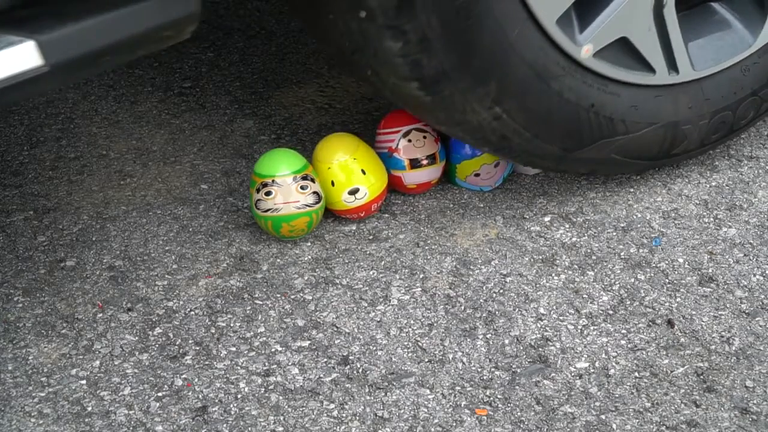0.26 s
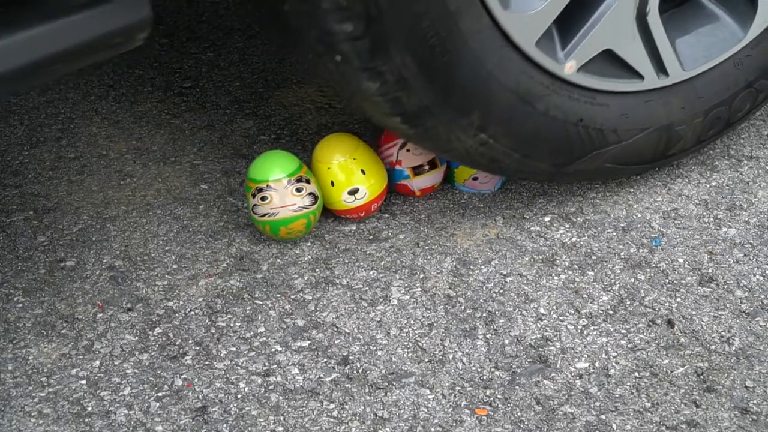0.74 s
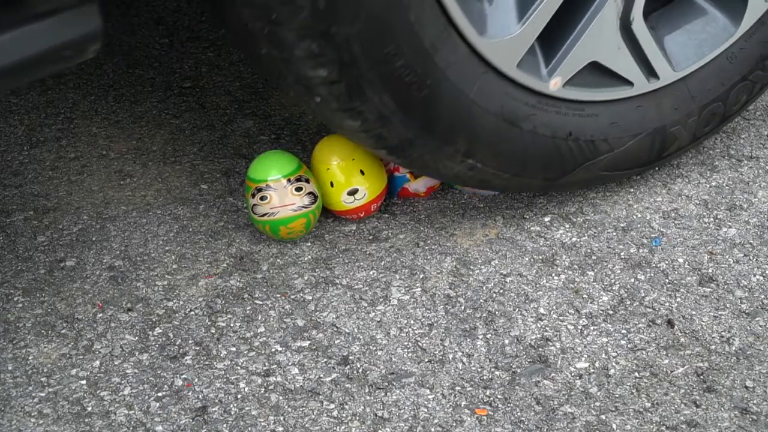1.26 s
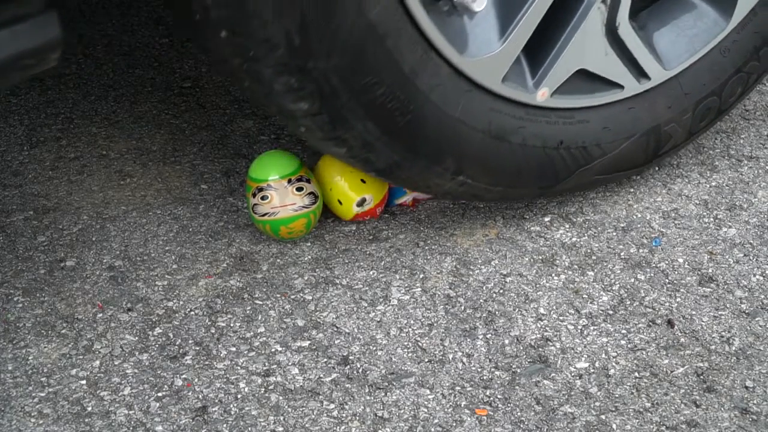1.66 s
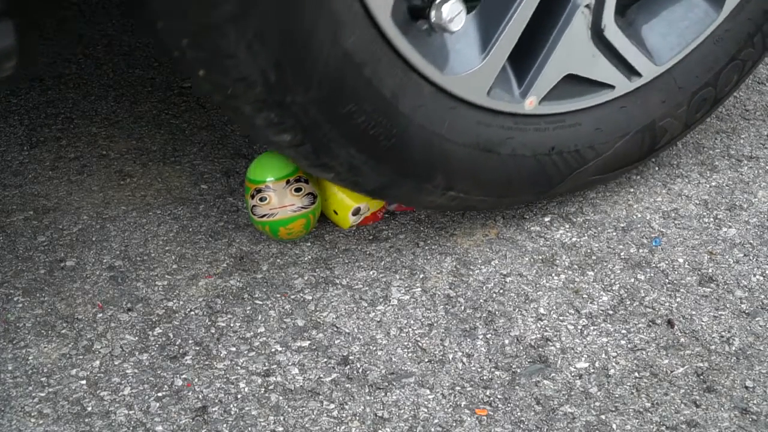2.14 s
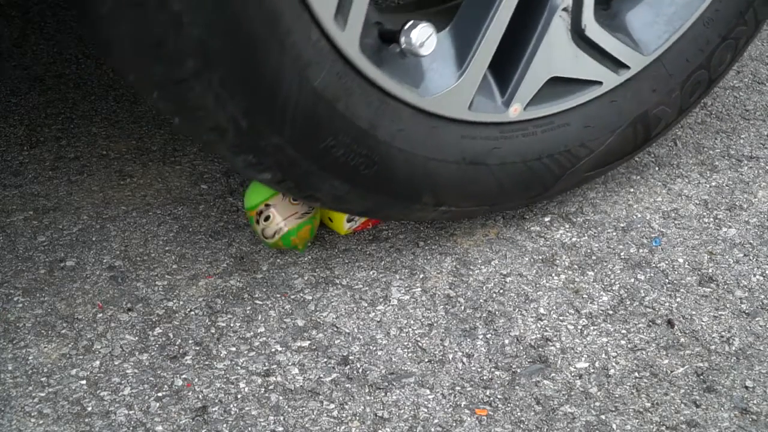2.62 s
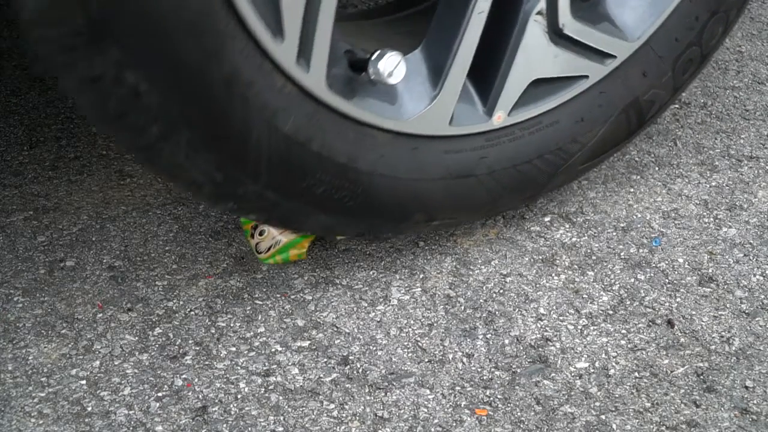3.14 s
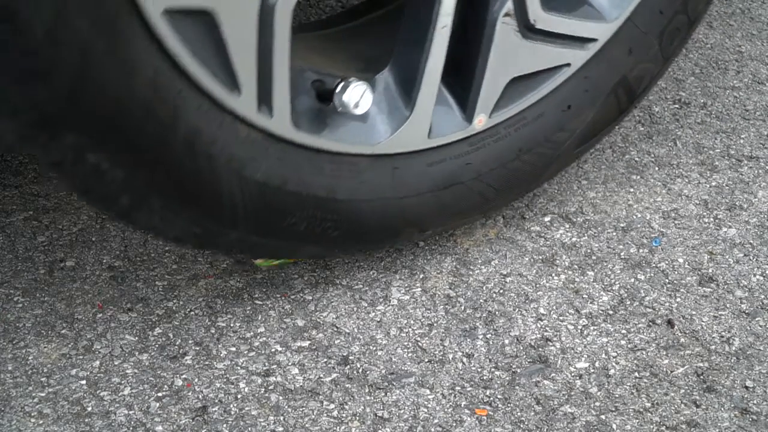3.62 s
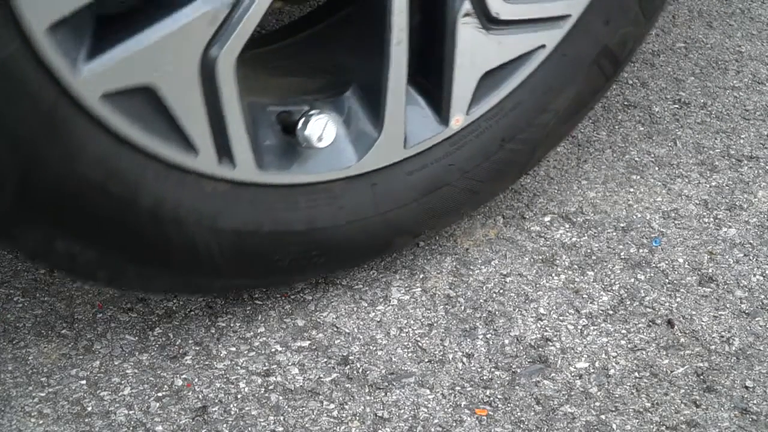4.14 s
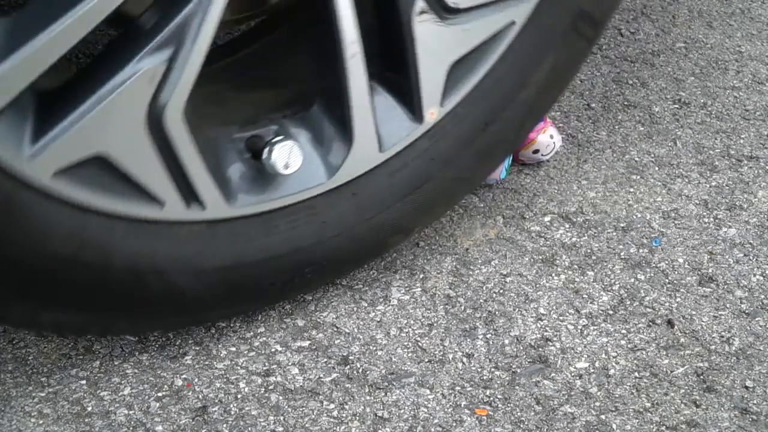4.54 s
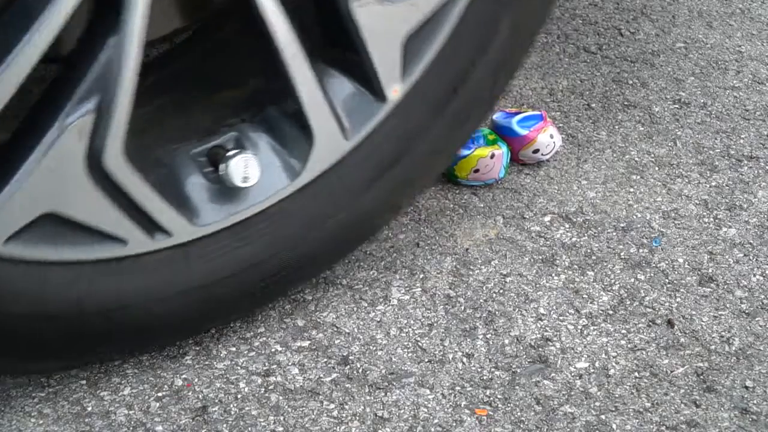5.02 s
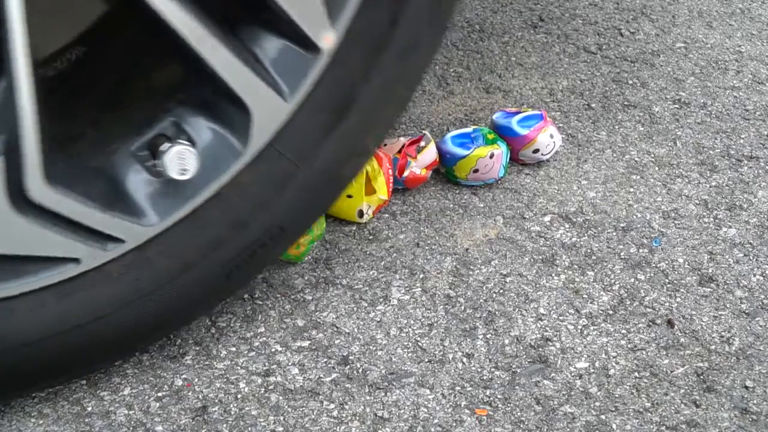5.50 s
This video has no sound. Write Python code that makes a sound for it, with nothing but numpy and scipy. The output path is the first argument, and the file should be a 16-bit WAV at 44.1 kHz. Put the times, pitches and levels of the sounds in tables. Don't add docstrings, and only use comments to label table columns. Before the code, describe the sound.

A close, stereo outdoor sound beside a car wheel on asphalt. A low engine idle rumbles steadily throughout, with a soft hum that is stronger in the first second and a half; its revs rise slightly at the end. From the very start hollow plastic shells collapse under the slowly rolling tyre: a strong pop and crack at 0.03 s, another deep one near 0.78, then clusters around 1.2-1.75, 2.2-2.3, 2.55 and 2.9-3.1, with a last hard pop near 3.25. Between them run crunching splinters, dull grinding, snapping fragments and flying chips. Some blows carry a heavy tyre thump. From 3.3 to 3.6 it calms. Then flattened shells spring back with lighter hollow pops, notably at 4.04 and 4.6, a few briefly ringing shards, and scattered crackles until about 5.6. Short, tight reflections come from beneath the car; a far insect is barely audible.

```python
import sys
import numpy as np
from scipy import signal
from scipy.fft import rfft, irfft, next_fast_len
from scipy.io import wavfile
from scipy.ndimage import uniform_filter1d, map_coordinates

SR = 44100
rng = np.random.default_rng(int(sys.argv[2]) if len(sys.argv) > 2 else 0)


def bounce(signal):
    frames = np.transpose(np.atleast_2d(signal))
    limited = np.clip(frames, -1, 1)
    pcm = np.round(limited * 32767).astype(np.int16)
    wavfile.write(sys.argv[1], SR, pcm)


def to_linear_factor(level_db):
    exponent = np.asarray(level_db, float) / 20
    return 10 ** exponent


N = 254016


def unit(x):
    return x / np.sqrt(np.mean(x ** 2) + 1e-20)


def peak(rows):
    return rows / np.abs(rows).max(axis=1, keepdims=True)


def along(points, hz):
    point_hz, value = np.transpose(points)
    return np.interp(np.log(hz + 1), np.log(point_hz + 1), value)


def curves(rows):
    time_s, *columns = np.transpose(rows)
    return [np.interp(np.arange(N) / SR, time_s, column) for column in columns]


def wobble(rate_hz):
    knots = rng.standard_normal(int(N * 400 / SR) + 4)
    return map_coordinates(knots, [np.arange(N) * rate_hz / SR])


def filtered(x, response):
    m = next_fast_len(x.shape[-1] + 4096)
    spectrum = rfft(x, m) * response(np.fft.rfftfreq(m, 1 / SR))
    return irfft(spectrum, m)[..., :x.shape[-1]]


def resonance(f, hz, width_hz):
    return 1j * f * width_hz / (hz * hz - f * f + 1j * f * width_hz)


def placed(times_s, rows):
    track = np.zeros((2, N + rows.shape[-1]))
    for start_s, row in zip(times_s, rows):
        track[:, max(round(start_s * SR), 0):][:, :rows.shape[-1]] += row
    return track[:, :N]


# pitch_hz, t60_s
UNDER_CAR_DECAY = [(200, 0.13), (1000, 0.12), (3000, 0.18), (9000, 0.1)]


def echoes(events, length):
    noise = rng.standard_normal((events, 2, length))
    hz, t, z = signal.stft(noise, SR, nperseg=128)
    decay = to_linear_factor(-60 * t / along(UNDER_CAR_DECAY, hz)[:, None])
    tail = signal.istft(z * decay, SR, nperseg=128)[1][..., :length]
    build_up_s = 0.0087
    tail = tail * np.clip(np.arange(length) / (build_up_s * SR), 0, 1)
    return tail / np.linalg.norm(tail, axis=2, keepdims=True)


# pitch_hz, correlation
LIKENESS = [(100, 1), (190, 0.85), (460, 0.84), (1270, 0.69), (3510, 0.5), (9700, 0.3)]


def stereo(pair, spectrum):
    def mid_side(hz):
        turn = np.arccos(np.clip(along(LIKENESS, hz), -1, 1)) / 2
        return to_linear_factor(along(spectrum, hz)) * [np.cos(turn), np.sin(turn)]

    mid, side = filtered(pair, mid_side)
    return np.array([mid + side, mid - side]) / np.sqrt(np.mean(mid ** 2))


def insect():
    pitch_hz, level_db = 8400, -70.5
    noise = rng.standard_normal((2, N))
    line = unit(filtered(noise, lambda f: resonance(f, pitch_hz, 60) ** 2))
    return to_linear_factor(level_db + 2 * wobble(5)) * line


# time_s, turns_per_s
CRANK_SPEED = [
    (0, 9.7),
    (3.4, 10.94),
    (4.4, 10.1),
    (5.76, 13.3),
]
CRANK_ORDERS_DB = [-39, -35, -46, -38, -47, -49]


def crank():
    speed = curves(CRANK_SPEED)[0] * (1 + 0.0067 * wobble(2.8))
    turns = np.cumsum(speed) / SR
    total = np.zeros(N)
    for order, level_db in enumerate(CRANK_ORDERS_DB, start=1):
        tone = np.sin(2 * np.pi * (order * turns + rng.random()))
        total += to_linear_factor(level_db + 1.3 * wobble(5.1)) * tone
    return total


# time_s, rumble_db, hum_db
ENGINE_LEVELS = [(0, -27.5, -36.5), (.09, -38.5, -23.5), (.27, -30.5, -25.5), (.31, -30.5, -39),
                 (.8, -33, -37.5), (.9, -28, -28), (1.26, -38, -29.5), (1.35, -36, -40.5),
                 (2.9, -45.5, -39.5), (4.4, -37.5, -43.5), (5.76, -35, -65)]
# pitch_hz, density_db_per_hz
RUMBLE_SPECTRUM = [(18, -28.5), (29, -0.5), (49, -10), (70, -14), (98, -7), (125, -23), (210, -22),
                   (350, -120)]


def engine():
    firing_hz, panel_hz = 75.2, 223
    rumble_db, hum_db = curves(ENGINE_LEVELS)
    noise = stereo(rng.standard_normal((2, N)), RUMBLE_SPECTRUM)
    rumble = to_linear_factor(rumble_db + 1.5 + 1.3 * wobble(4)) * noise
    phase = 2 * np.pi * np.cumsum(firing_hz + 1.05 * wobble(7.5)) / SR
    hum = to_linear_factor(hum_db + 1.0 + 0.81 * wobble(4.3)) * np.sin(phase)
    panel = unit(filtered(rng.standard_normal(N), lambda f: resonance(f, panel_hz, 90) ** 2))
    return rumble + to_linear_factor(rumble_db - 12) * panel + hum


def grains(rate, spread_db, life_s, count):
    size_db = np.minimum(spread_db * rng.exponential(size=(count, N)), 6)
    sizes = to_linear_factor(size_db) * (rng.random((count, N)) < rate / SR)
    return signal.lfilter([1], [1, -np.exp(-1 / (life_s * SR))], sizes)[:, None]


# start_s, hold_s, splinter_db, grind_db
COLLAPSES = [(0.026, 0.054, -30.5, -36), (0.69, 0.084, -23, -49), (0.793, 0.31, -21.5, -54),
             (1.178, 0.19, -26, -33), (1.461, 0.064, -20.5, -27.5), (1.976, 0.089, -33.5, -32.5),
             (2.174, 0.11, -19.5, -24.5), (2.57, 0.16, -24, -39), (2.91, 0.02, -19, -22),
             (3.624, 0.23, -37, -37), (3.95, 0.11, -52, -32.5), (4.518, 0.084, -32, -32.5),
             (4.775, 0.13, -37, -37.5), (5.028, 0.13, -32, -28), (5.38, 0.12, -27.5, -31)]


def crush_db(collapse_db, creak_db):
    rise_s, settle_db_per_s = 0.011, 156
    start_s, hold_s = np.transpose(COLLAPSES)[:2, :, None]
    steps = np.arange(0, N, 32)
    t = steps / SR - start_s
    shape = np.clip(t / rise_s, 0, 1) * to_linear_factor(-settle_db_per_s * np.maximum(t - hold_s, 0))
    collapse_power = ((to_linear_factor(collapse_db)[:, None] * shape) ** 2).sum(axis=0)
    power = collapse_power + to_linear_factor(creak_db[steps]) ** 2
    return np.interp(np.arange(N), steps, 10 * np.log10(power))


# time_s, splinter_db, grind_db, finest_splinters_db
CREAK_LEVELS = [(0, -31.5, -38, 0), (.55, -41.5, -38.5, 9), (.64, -38, -37.5, 0), (1.1, -36, -35.5, -11.5),
                (1.44, -54, -41, 0.5), (1.7, -23.5, -38, -1.5), (2.1, -37, -37, -2), (2.5, -30, -39, -2),
                (3.1, -30, -36.5, -7), (3.58, -38, -40, -5), (3.9, -46, -42, 7), (4.25, -41.5, -42, -6),
                (4.45, -35.5, -35.5, -4), (4.73, -38, -35.5, -0.5), (4.9, -39.5, -36, 2.5),
                (5.3, -28.5, -32, -1.5), (5.76, -34, -35, -7)]
# pitch_hz, density_db_per_hz
SPLINTER_SPECTRUM = [(530, -31.5), (900, -13.5), (1130, -0.5), (2730, 1.5), (4140, -3.5), (5620, -5),
                     (8110, -11), (8960, -20), (9600, -50), (12500, -71.5)]
# pitch_hz, density_db_per_hz
GRIND_SPECTRUM = [(65, -37.5), (130, -7.5), (250, -1), (500, -2), (900, -2.5), (1500, -6.5), (2500, -33.5),
                  (9000, -76.5)]
FLATTENED_SIZES_DB = [2.5, -4.5, -2.5, 3, 2.5, 3, 0]
SPLINTER_HZ = np.geomspace(1100, 8000, num=7)[:, None, None]


def crunch():
    flattened_s = 4.7
    *creak_db, bright_db = curves(CREAK_LEVELS)
    collapse_db = np.transpose(COLLAPSES)[2:]
    splinter_db, grind_db = map(crush_db, collapse_db, creak_db)
    load = wobble(30)

    shared = grains(rate=220, spread_db=4.0, life_s=0.0029, count=1)[0]
    own = grains(rate=230, spread_db=1.5, life_s=0.00093, count=len(SPLINTER_HZ))
    rattles = (0.66 + 0.6 * shared + 2.1 * own) * rng.standard_normal((len(own), 2, N))
    flat = np.arange(N) > flattened_s * SR
    rattles = rattles * to_linear_factor([[2.1 * wobble(16) + late_db * flat] for late_db in FLATTENED_SIZES_DB])
    ringing = filtered(rattles, lambda f: resonance(f, SPLINTER_HZ, 0.42 * SPLINTER_HZ))
    crackle = stereo(ringing.sum(axis=0) * to_linear_factor(1.3 * load), SPLINTER_SPECTRUM)
    finest = filtered(crackle, lambda f: 1 / (1 + (4200 / (f + 1)) ** 4))
    splinters = to_linear_factor(splinter_db - 1.5) * (crackle + (to_linear_factor(bright_db) - 1) * finest)

    grind_swell = to_linear_factor(0.7 * load + 1.3 * wobble(22))
    dull = (np.minimum(shared, 2.5) + 1.2) * grind_swell * rng.standard_normal((2, N))
    return splinters + to_linear_factor(grind_db + 2.0) * stereo(dull, GRIND_SPECTRUM)


# start_s, peak_db, pitch_hz
FRAGMENTS = [(0.0742, -19, 1630), (0.0838, -22, 2000), (0.1654, -24, 5710), (0.168, -15, 3330),
             (0.2074, -21, 3570), (0.211, -22, 3210), (0.3139, -14, 1800), (0.366, -21, 6360),
             (0.3808, -27, 1420), (0.391, -9.5, 5370), (0.3904, -14, 2920), (0.4956, -13.5, 2860),
             (0.504, -19.5, 1630), (0.5518, -12, 3400), (0.6523, -16.5, 5090), (0.6724, -22.5, 2030),
             (0.678, -15.5, 3900), (0.7488, -16, 1800), (0.8264, -13.5, 1840), (0.9567, -19, 2860),
             (0.9643, -21, 1430), (0.98, -14, 5800), (0.979, -18, 2270), (0.999, -18, 1600),
             (1.037, -11, 2900), (1.1127, -19, 2020), (1.1734, -17, 2480), (1.1893, -16, 826),
             (1.2033, -16, 5750), (1.2509, -15, 5090), (1.2933, -6, 3550), (1.308, -21, 4540),
             (1.324, -15.5, 1110), (1.3352, -14.5, 3260), (1.4717, -22, 720), (1.5083, -12, 2270),
             (1.57, -20, 3210), (1.5808, -11, 3210), (1.5897, -16, 3550), (1.593, -20, 3210),
             (1.635, -18, 2860), (1.672, -30, 5090), (1.678, -12, 1630), (1.713, -21, 1580),
             (1.7306, -23, 990), (1.7454, -21, 5670), (1.7455, -17, 2550), (1.777, -16, 5710),
                    (1.8147, -18, 2820), (1.867, -15, 2800), (1.9577, -27, 5090), (1.9857, -19, 7100),
                    (1.9868, -15, 2530), (1.9853, -15, 446), (1.9948, -27, 1560), (1.9997, -26, 4500),
                    (2.0123, -17, 4660), (2.1255, -14, 7270), (2.149, -23, 3300), (2.184, -18, 5850),
                    (2.2202, -12, 2000), (2.2533, -9.5, 2500), (2.2626, -8.5, 5900), (2.2633, -13, 3300),
                    (2.2666, -26, 448), (2.2785, -12.5, 4140), (2.2999, -6.5, 3340), (2.314, -14.5, 5100),
                    (2.3195, -19, 4950), (2.3185, -18.5, 1370), (2.4025, -25, 6410), (2.474, -24, 1820),
                    (2.5243, -11.5, 5600), (2.5587, -10, 1100), (2.6467, -17.5, 4040), (2.7032, -11, 5540),
                    (2.7014, -11.5, 2450), (2.76, -24, 3210), (2.784, -18, 2780), (2.8114, -19.5, 7100),
                    (2.8185, -27, 1120), (2.8255, -18, 2270), (2.8397, -19.5, 4040), (2.8727, -16, 5800),
                    (2.8868, -14.5, 6500), (2.9096, -10, 2750), (2.9063, -17.5, 547), (2.9288, -17, 2320),
                    (2.934, -15.5, 4600), (3.0028, -20, 2130), (3.0355, -20, 2020), (3.0768, -9.5, 5740),
             (3.0855, -12, 2530), (3.1094, -21, 2520), (3.1383, -20, 905), (3.1494, -26, 5090),
                  (3.2063, -19, 3600), (3.2085, -27, 1430), (3.246, -15, 1390), (3.4617, -22, 3600),
                  (3.551, -22.5, 5700), (3.3195, -28, 4300), (3.6345, -21.5, 1390), (3.6446, -28, 2830),
                  (3.642, -26, 5090), (3.73, -23, 6410), (3.8687, -20, 2900), (4.0549, -17, 700),
                  (4.1094, -17, 2880), (4.5456, -26, 5090), (4.548, -17, 1150), (4.5523, -14, 4000),
                  (4.5548, -13, 3250), (4.5658, -15, 3180), (4.871, -19.5, 4040), (4.937, -19, 4400),
                  (4.98, -23.5, 1260), (5.047, -16, 5040), (5.059, -19, 4970), (5.07, -19.5, 4570),
                  (5.1346, -23, 5090), (5.145, -19, 1370), (5.15, -18, 5040), (5.2167, -13, 2860),
                  (5.279, -21, 3800), (5.337, -25, 2300), (5.4595, -25, 5640), (5.5687, -25, 5710),
                  (5.5811, -25, 2920), (5.592, -25, 2880),
             (.099, -20.5, 1710), (.712, -20, 725), (0.909, -22, 2570), (.9255, -28, 1350),
                   (.9365, -19, 2400), (1.0333, -19, 1570), (1.0803, -14, 2300), (1.2266, -20, 1640),
                   (1.286, -18.5, 950), (1.365, -29.5, 800), (1.522, -18, 900), (1.692, -26, 1500),
                   (2.0076, -16, 4830), (2.044, -22.5, 513), (2.4043, -32, 2200), (2.61, -12, 1940),
                   (2.8773, -21, 1660), (3.0595, -20, 1940), (3.339, -34.5, 506), (3.7215, -31, 770),
                   (4.584, -18.5, 1300), (5.194, -23, 560), (5.4524, -18, 3340), (5.564, -23, 786)]


def snaps():
    life_cycles, rise_cycles, echo_db = 10.5, 0.84, -6.5
    events = FRAGMENTS
    start_s, peak_db, pitch_hz = np.transpose(events)[:, :, None]
    cycles = pitch_hz * np.arange(1280) / SR
    second, side = rng.random((len(start_s), 2, 1)).transpose(1, 0, 2)
    modes = np.sin(2 * np.pi * cycles)
    modes = modes + 0.19 * np.sin(2 * np.pi * cycles * (1.192 + 0.7 * second))
    envelope = to_linear_factor(-60 * cycles / life_cycles) * (1 - np.exp(-cycles / rise_cycles))
    direct = to_linear_factor(peak_db + 5.0) * peak(modes * envelope)
    wet = signal.fftconvolve(direct[:, None], echoes(len(start_s), cycles.shape[1]), axes=2)
    padded = np.pad(direct, [(0, 0), (0, wet.shape[2] - direct.shape[1])])[:, None]
    panned = padded * to_linear_factor(3.5 * (side[:, None] - .5) * [[1], [-1]])
    return placed(start_s[:, 0], panned + to_linear_factor(echo_db) * wet)


# start_s, peak_db, cavity_hz, thump_db
BUCKLES = [(0.012, -14.5, 280, -26), (0.037, -4.5, 252, 4.5), (0.7139, -6, 375, -15),
           (0.748, -9.5, 660, -25), (0.78, -3.5, 231, -3), (1.189, -15.5, 480, -21), (1.323, -14, 405, -13),
           (1.3839, -5, 318, -5), (1.4741, -15, 264, 11.5), (1.6317, -14, 320, 1), (1.7407, -11, 466, -10),
           (1.919, -22.5, 283, 10), (1.987, -13.5, 300, 8.5), (2.1, -13, 376, -12),
           (2.1783, -4.5, 205, -18), (2.264, -18, 450, 9), (2.395, -20.5, 460, -1), (2.5598, -5, 214, -3),
           (2.568, -14, 327, -17), (2.6736, -22, 454, 6), (2.741, -12.5, 209, -4), (2.908, -11.5, 240, -13),
           (2.9262, -6, 700, -4), (3.0763, -17, 294, -23), (3.2459, -7.5, 870, -21)]
# start_s, peak_db, cavity_hz, thump_db
SPRING_BACKS = [(3.6335, -15, 810, -27), (3.691, -15.5, 900, -14), (3.7623, -14.5, 573, -27),
                (3.8466, -23, 550, 1), (3.977, -10, 775, -9), (4.021, -10.5, 710, -7),
                (4.0436, -0.5, 723, -32), (4.047, -16.5, 192, -1), (4.312, -21.5, 870, -23),
                (4.35, -18.5, 810, -14), (4.372, -22, 840, -9), (4.474, -17.5, 620, -19),
                (4.492, -15.5, 900, -10), (4.548, -13.5, 340, -23), (4.6006, -8.5, 664, -30),
                (4.6379, -5, 347, 0), (4.8107, -14, 486, -28), (5.1453, -11.5, 660, -27),
                (5.245, -11, 1110, -33), (5.4328, -11, 760, -13), (5.483, -14, 800, -17),
                (5.516, -12, 525, -15)]
# start_s, peak_db, pitch_hz, thump_db
RINGING_SHARDS = [
    (.807, -6, 1566, -2.5),
    (1.677, -10, 1480, -31),
    (2.701, -21, 2400, -10),
    (3.8448, -10, 3420, -23),
    (3.861, -37, 3350, -19),
    (4.123, -17, 2760, -30),
    (5.214, -22, 2880, 2),
]
# pitch_hz, width_hz, level_db
TYRE_MODES = [
    (186.2, 21, 1),
    (191.6, 34.5, -1.5),
    (345, 38, -6.5),
]


def pops():
    cavity_cycles, shard_cycles = 9.6, 39
    rise_cycles = 0.2
    events = BUCKLES + SPRING_BACKS + RINGING_SHARDS
    start_s, peak_db, cavity_hz, thump_db = np.transpose(events)[:, :, None]
    t60_s = np.where(cavity_hz > 1300, shard_cycles, cavity_cycles) / cavity_hz
    t = np.arange(4096) / SR
    envelope = to_linear_factor(-60 * t / np.clip(t60_s, .006, .06)) * (1 - np.exp(-t * cavity_hz / rise_cycles))
    ring = np.sin(2 * np.pi * cavity_hz * t) * envelope

    def tyre(f):
        total = 0.48 * resonance(f, 600, 500)
        for k, (hz, width_hz, level_db) in enumerate(TYRE_MODES):
            total = total + (-1) ** k * to_linear_factor(level_db) * resonance(f, hz, width_hz)
        return total

    push = (t / .0004) * np.exp(-t / 0.00045) * np.ones_like(start_s)
    thump = peak(filtered(push, tyre))
    direct = -to_linear_factor(peak_db - 1.0) * (peak(ring) + to_linear_factor(thump_db) * thump)
    tails = echoes(len(start_s), len(t))
    tails = tails[:, :1] + 0.37 * tails
    sent = direct - to_linear_factor(peak_db - 9.5) * thump
    wet = signal.fftconvolve(sent[:, None], tails, axes=2)[..., :len(t)]
    return placed(start_s[:, 0] - .0005, direct[:, None] + to_linear_factor(-7.5) * wet)


# start_s, peak_db, tilt_db_per_octave
LOADING_SPLITS = [(0.0353, -5, -0.5), (0.0741, -17, -14), (0.165, -16, -2.5), (0.2124, -10, -3),
                  (0.2927, -11.5, -5), (0.3034, -13.5, -6), (0.313, -17, -2), (0.3788, -5, -0.5),
                  (0.39, -16, 1.5), (0.4454, -9.5, 3), (0.4756, -17, 4), (0.496, -10, -3),
                  (0.5478, -11, -3.5), (0.608, -17.5, -1), (0.6519, -23, 2), (0.7118, -4, -3),
                  (0.7484, -12, 6), (0.7777, -2, -5), (0.8068, -11.5, 6), (0.9997, -7, -2.5), (1.016, -14, 2),
                  (1.1724, -16.5, -7), (1.2251, -32, -1), (1.2378, -5, 2.5), (1.2925, -7, 5.5),
                  (1.3226, -6, 3),
                  (1.3824, -11.5, -2.5), (1.406, -23, 6), (1.462, -13.5, -3), (1.4724, -4, 0.5),
                 (1.5, -9, -14), (1.581, -11.5, 1), (1.6291, -8, -2.5), (1.6523, -12.5, 4.5),
                 (1.6768, -8.5, 0), (1.738, -3.5, 0), (1.8266, -13.5, 1.5), (1.8684, -26, -3),
                 (1.9139, -9.5, -7.5), (1.986, -10.5, -6), (2.1, -12.5, 4), (2.147, -23, 9), (2.177, -7, 1),
                 (2.205, -22, 4), (2.2187, -7.5, -10.5), (2.241, -9.5, 4), (2.2604, -5, -3.5),
                 (2.2808, -10, -4), (2.299, -3, 4.5), (2.4277, -17, -2), (2.4596, -11.5, -7.5),
                  (2.5233, -18, 8), (2.562, -11, 2), (2.584, -6, -2.5), (2.5998, -5.5, -2), (2.685, -21, -1),
               (2.7023, -15, -3), (2.739, -6, 1), (2.783, -17, 2), (2.8097, -25, 2), (2.8249, -15.5, -7),
               (2.863, -13.5, -2.5), (2.8842, -8.5, 2), (2.9076, -5.5, -0.5), (2.9288, -10.5, 10),
               (2.9734, -10.5, -5), (3.0014, -17.5, -2.5), (3.036, -21, 9), (3.0435, -9, -2.5),
               (3.0742, -3.5, 1), (3.1922, -12, -3.5), (3.2458, -5, -4.5), (3.3295, -16.5, -4),
               (3.4997, -24, -7), (3.4889, -16.5, -4.5), (3.5192, -21, -2), (3.552, -26, 9),
               (3.5695, -23, -5)]
# start_s, peak_db, tilt_db_per_octave
UNLOADING_SPLITS = [(3.6327, -19.5, 2), (3.675, -20.5, 7.5), (3.761, -18.5, 2.5), (3.845, -14.5, -3.5),
                    (3.957, -11.5, -3), (4.022, -30, -13), (4.043, -12.5, -4.5), (4.1086, -12.5, 1),
                    (4.386, -19, -1.5), (4.538, -15.5, 1), (4.555, -8.5, 0), (4.5986, -9, 1),
                    (4.637, -11.5, -7.5), (4.8, -21.5, 8), (4.8137, -14, -5), (4.853, -16.5, 7),
                    (4.968, -22, 2), (4.976, -13, 0.5), (5.022, -19.5, 1.5), (5.045, -20, 0),
                    (5.118, -12, -1.5), (5.145, -10.5, -1), (5.269, -15.5, 3), (5.3117, -11, -4),
                    (5.4862, -14, 1.5), (5.5084, -22, 4), (5.5637, -22, -2)]
# start_s, peak_db
CHIPS = [(0.094, -12.5), (0.356, -23), (0.678, -19.5), (0.844, -11.5), (0.8734, -15), (0.9432, -14),
         (1.053, -16), (1.1113, -18), (1.1365, -13), (1.179, -12), (1.1896, -18), (1.947, -18.5),
         (2.052, -14.5), (2.1234, -27), (2.6569, -12), (2.872, -21), (3.1386, -18), (3.421, -23),
         (4.0658, -14.5), (4.209, -23), (4.291, -27), (4.464, -29), (4.4756, -17.5), (4.581, -12),
         (4.651, -19), (4.914, -21), (5.0604, -13), (5.241, -23), (5.5903, -35), (5.7394, -27)]
# pitch_hz, level_db
CRACK_COLOUR = [(200, -23.5), (700, -4.5), (1500, 5), (3000, 0.5), (5000, -2.5), (8000, -7.5),
                (12000, -54.5)]
# pitch_hz, width_hz, level_db
SHELL_MODES = [(3180, 830, -6), (5750, 580, -5.5)]


def cracks():
    run_on_db = -2
    chip_tilt_db, chip_run_on_db = 2, -2
    splits = [*LOADING_SPLITS, *UNLOADING_SPLITS]
    events = [(*row, run_on_db) for row in splits]
    events += [(*row, chip_tilt_db, chip_run_on_db) for row in CHIPS]
    start_s, peak_db, tilt_db, after_db = np.transpose(events)[:, :, None]
    count = len(start_s)
    t = np.arange(3072) / SR
    front = t[:256]
    envelope = (front / .0006) * np.exp(-front / 0.0009)
    burst = rfft(rng.standard_normal((count, len(front))) * envelope)
    even = burst / np.sqrt(np.abs(uniform_filter1d(np.abs(burst) ** 2, size=7, axis=1)))
    burst = np.pad(irfft(even), [(0, 0), (0, len(t) - len(front))])

    def colour(f):
        tilt = tilt_db * np.log2(np.clip(f, 600, 8000) / 2500)
        wall = sum(to_linear_factor(level_db) * resonance(f, hz, width_hz) for hz, width_hz, level_db in SHELL_MODES)
        return to_linear_factor(along(CRACK_COLOUR, f) + tilt) * np.abs(1 + wall)

    direct = to_linear_factor(peak_db + 1.0) * peak(filtered(burst, colour))
    wet = signal.fftconvolve(direct[:, None], echoes(count, len(t)), axes=2)[..., :len(t)]
    jerks_db = uniform_filter1d(rng.standard_normal((count, 1, len(t))), size=60) * 15
    wet = (wet[:, :1] * 0.34 + wet * 0.93) * to_linear_factor(jerks_db - 2.5)
    sides = to_linear_factor(2.2 * rng.standard_normal((count, 1, 1)) * [[1], [-1]])
    balance = to_linear_factor([[-.3], [.3]]) * sides
    return placed(start_s[:, 0] - .0001, balance * (direct[:, None] + to_linear_factor(after_db[:, None]) * wet))


def scene():
    return insect() + crank() + engine() + crunch() + snaps() + pops() + cracks()


def top_cut(x):
    return signal.sosfilt(signal.butter(12, 10300, fs=SR, output="sos"), x)


# blow_s, gain_db
GAIN_DUCKS = [
    (0.034, -20),
    (.778, -26),
    (1.472, -22),
    (2.3, -14),
    (2.56, -16),
    (3.073, -8),
    (4.638, -3),
]


def record(dry):
    top_hz = 9123
    t = np.arange(N) / SR
    duck_db = sum(gain_db * ((t > blow_s - .0062) & (t < blow_s - .0004)) for blow_s, gain_db in GAIN_DUCKS)
    held = dry * to_linear_factor(uniform_filter1d(duck_db, size=40))
    rounded = np.tanh(held / 1.724) * 1.172

    def band(f):
        low_cut = f ** 2 / (f ** 2 + 6 ** 2)
        high_cut = 1 / (1 + (f / top_hz) ** 150)
        leak = to_linear_factor(-35) / (1 + (f / 9900) ** 20)
        return low_cut * (high_cut + leak)

    mix = filtered(rounded, band)
    return top_cut(mix)


dry = scene()
out = record(dry)
bounce(out)
```